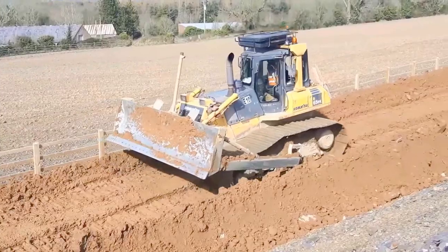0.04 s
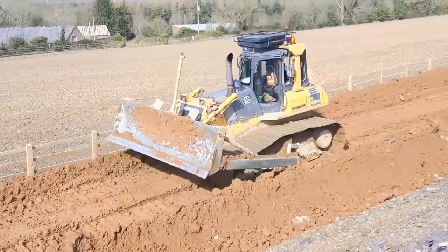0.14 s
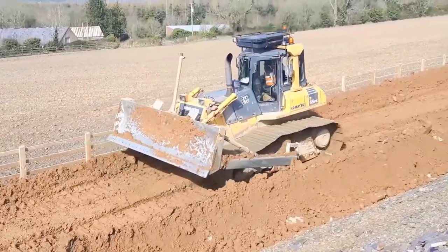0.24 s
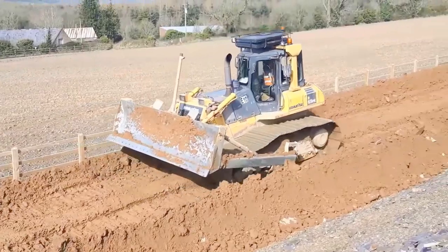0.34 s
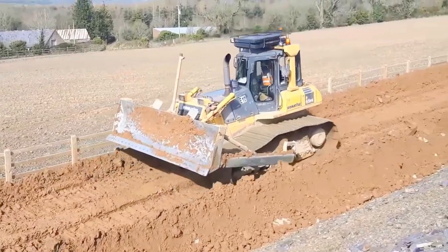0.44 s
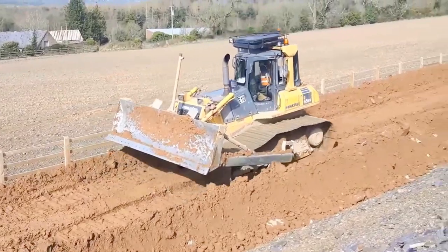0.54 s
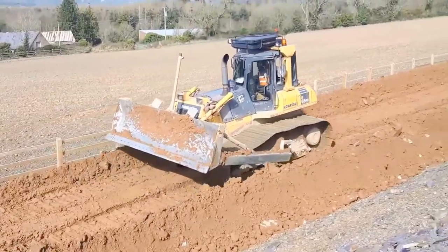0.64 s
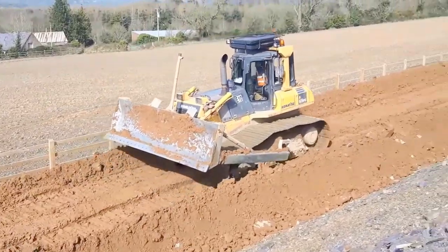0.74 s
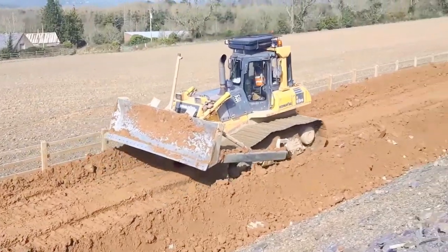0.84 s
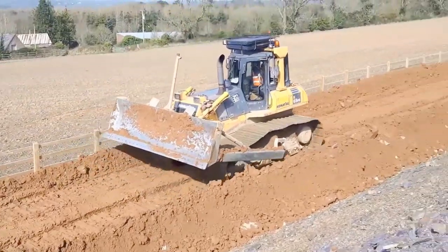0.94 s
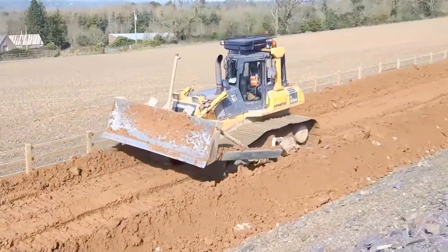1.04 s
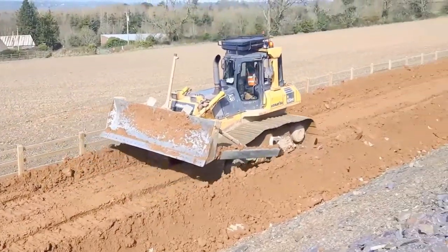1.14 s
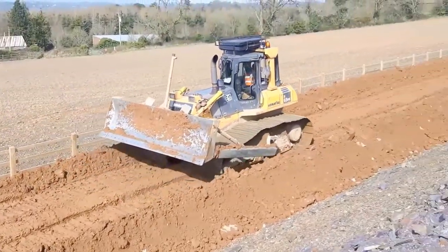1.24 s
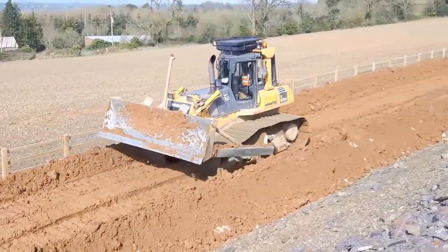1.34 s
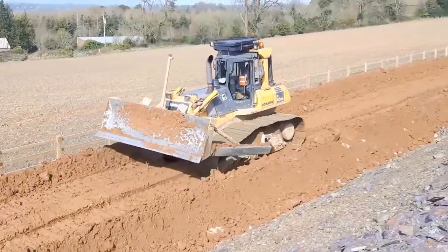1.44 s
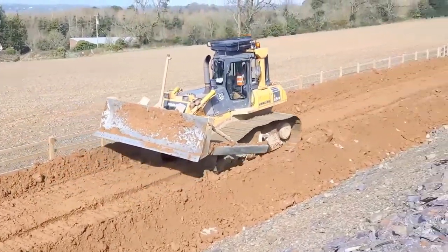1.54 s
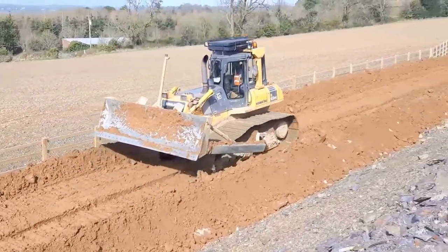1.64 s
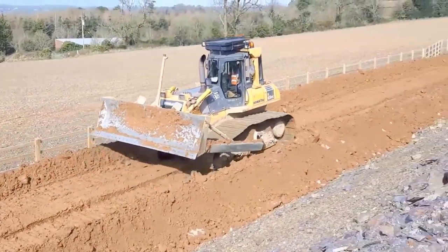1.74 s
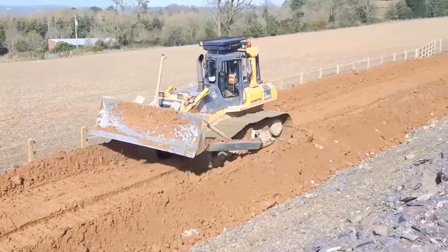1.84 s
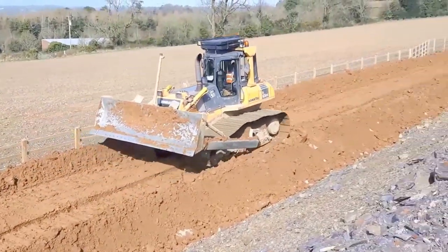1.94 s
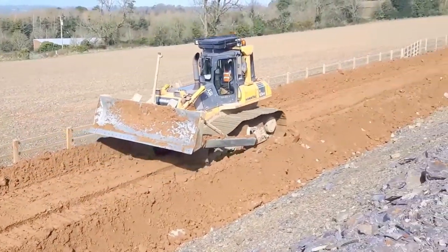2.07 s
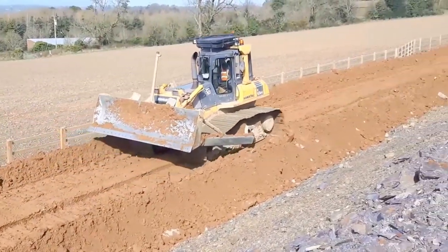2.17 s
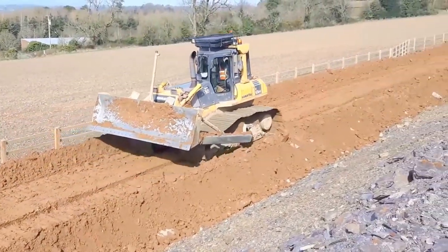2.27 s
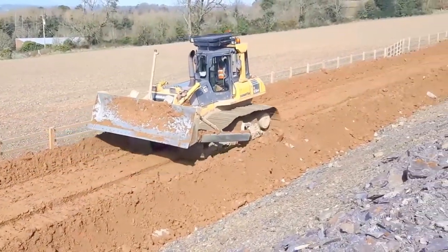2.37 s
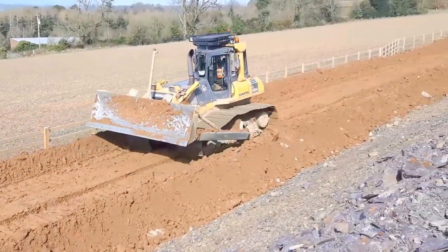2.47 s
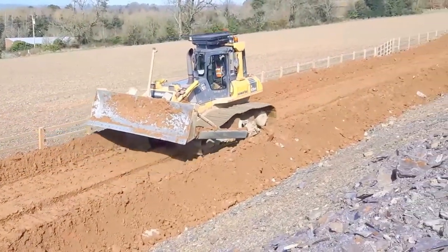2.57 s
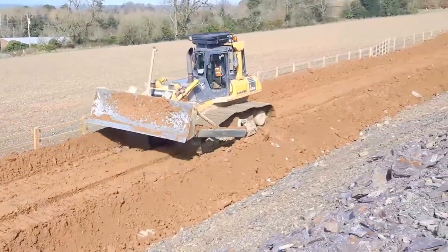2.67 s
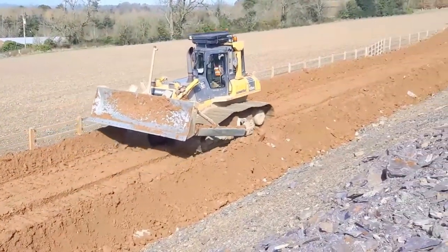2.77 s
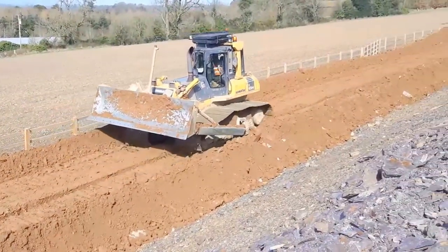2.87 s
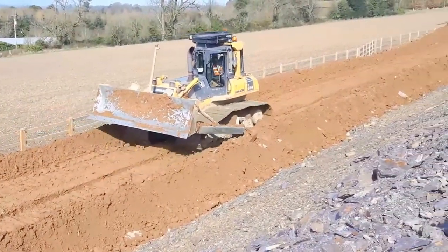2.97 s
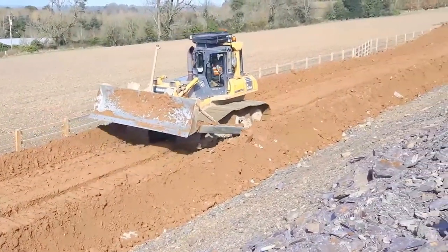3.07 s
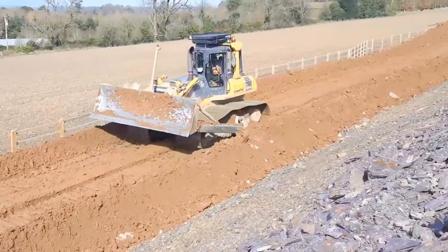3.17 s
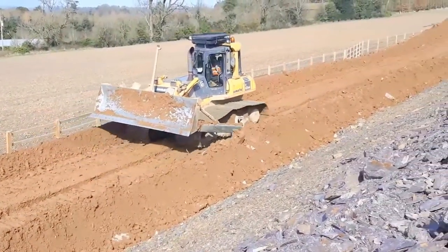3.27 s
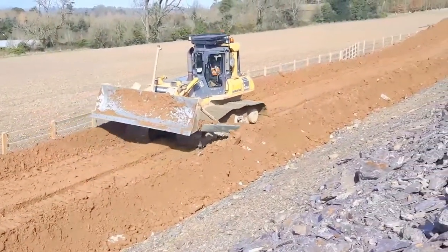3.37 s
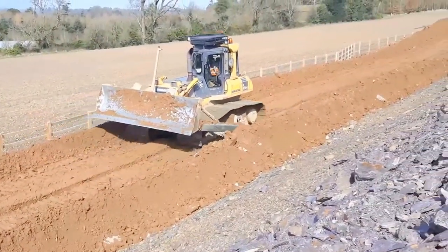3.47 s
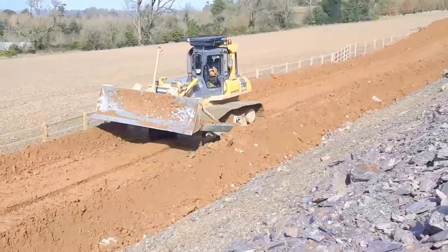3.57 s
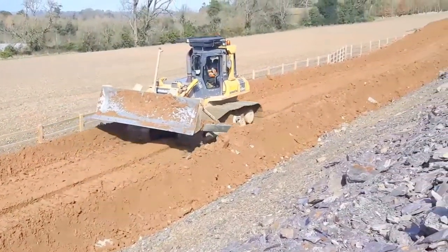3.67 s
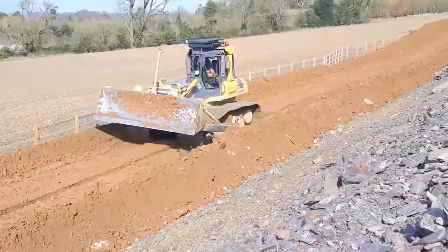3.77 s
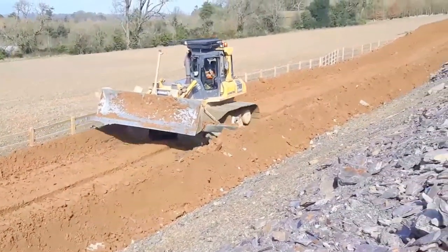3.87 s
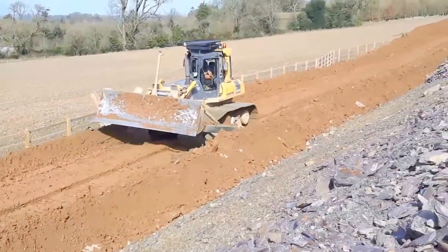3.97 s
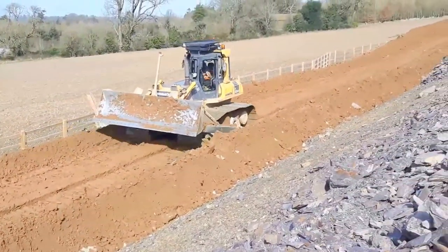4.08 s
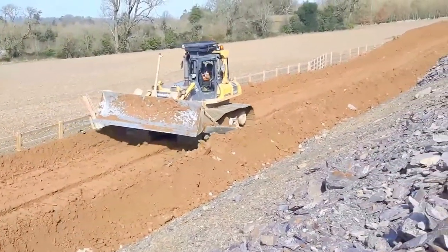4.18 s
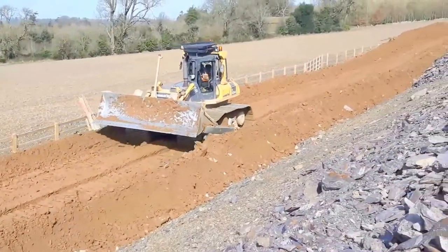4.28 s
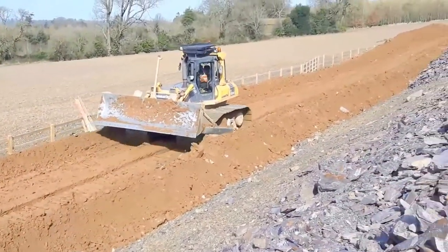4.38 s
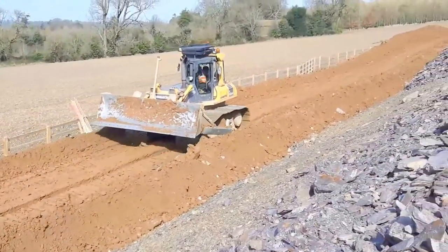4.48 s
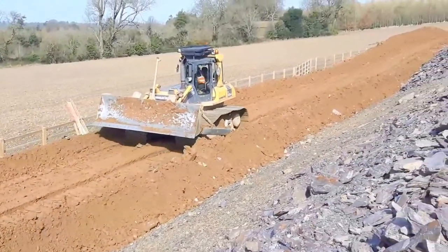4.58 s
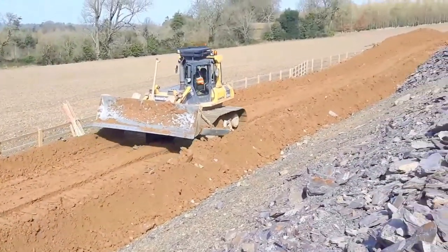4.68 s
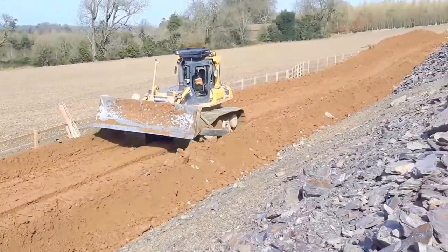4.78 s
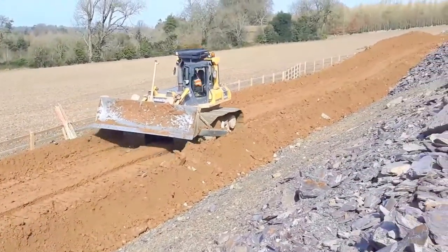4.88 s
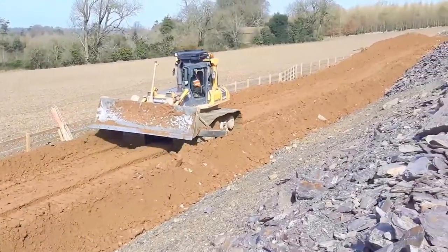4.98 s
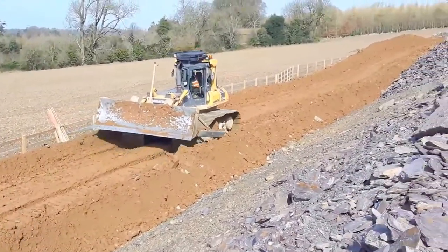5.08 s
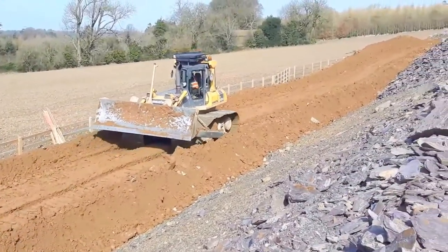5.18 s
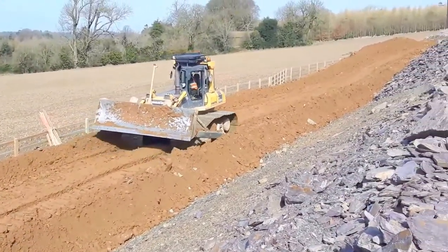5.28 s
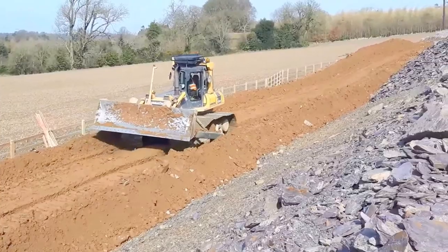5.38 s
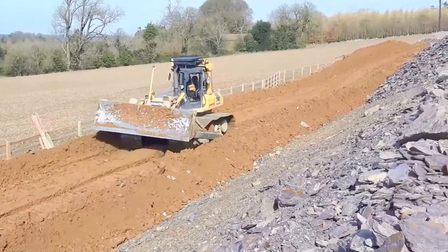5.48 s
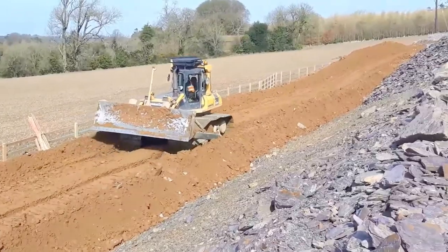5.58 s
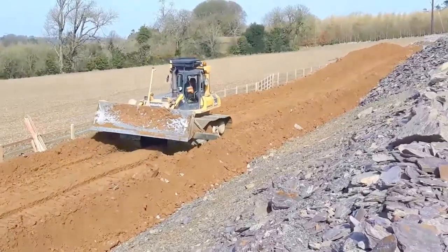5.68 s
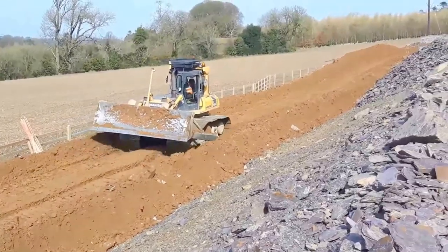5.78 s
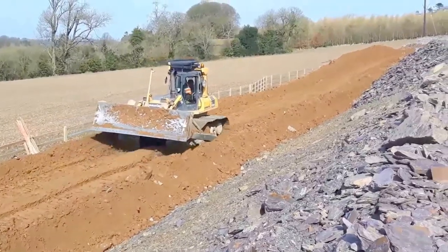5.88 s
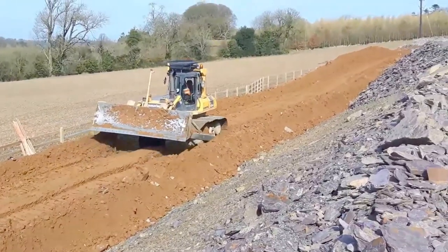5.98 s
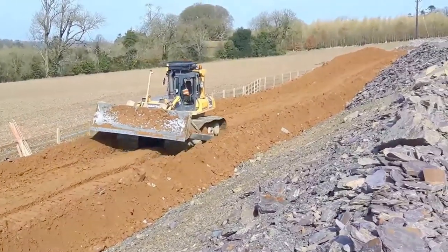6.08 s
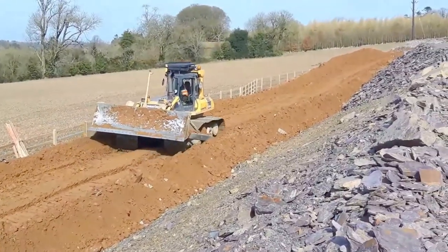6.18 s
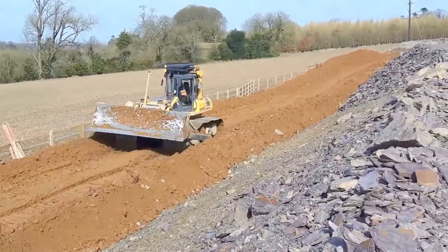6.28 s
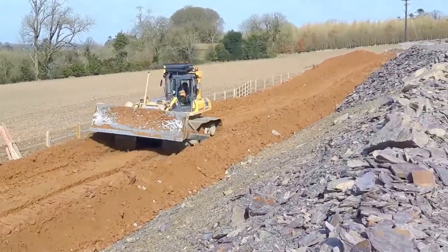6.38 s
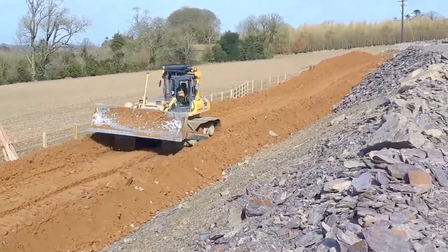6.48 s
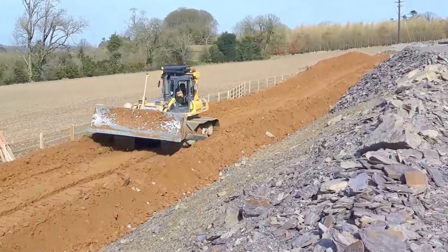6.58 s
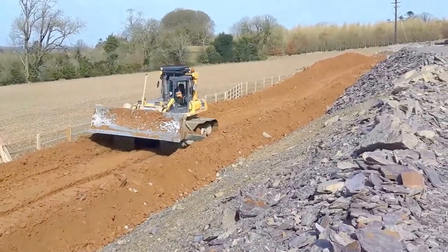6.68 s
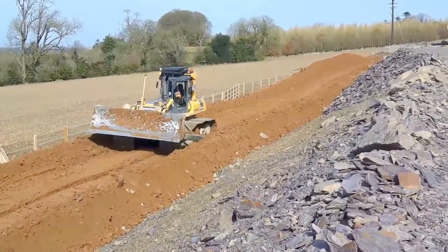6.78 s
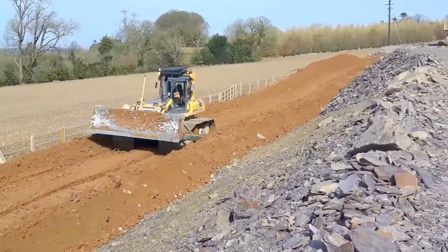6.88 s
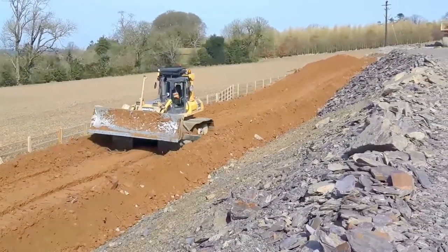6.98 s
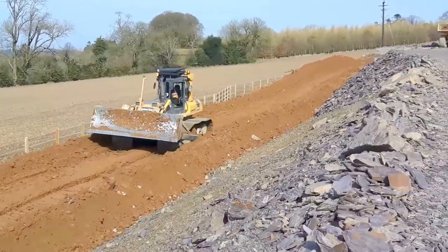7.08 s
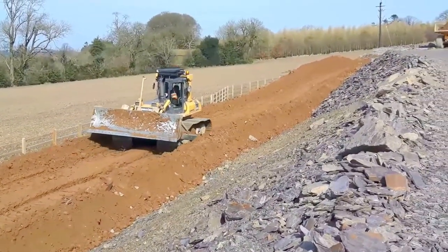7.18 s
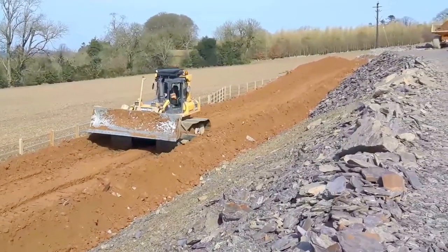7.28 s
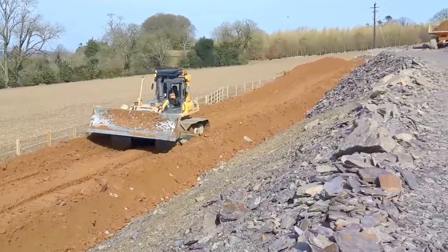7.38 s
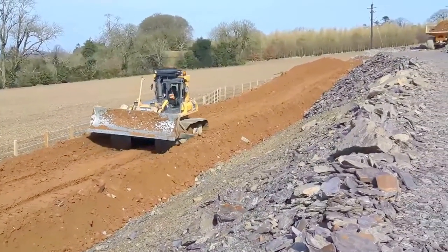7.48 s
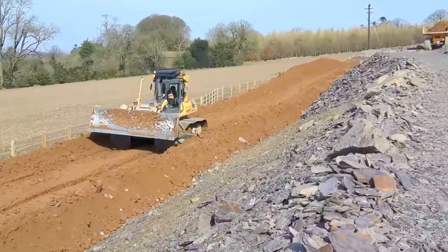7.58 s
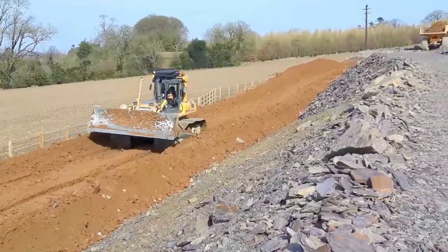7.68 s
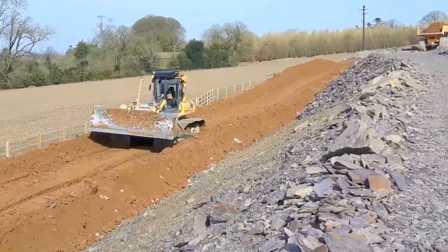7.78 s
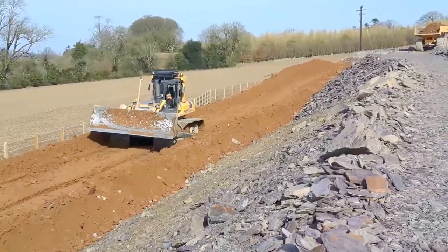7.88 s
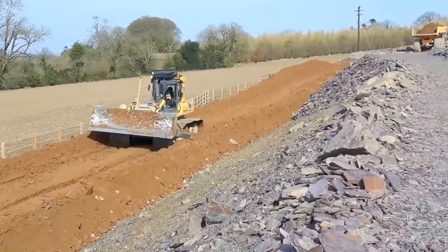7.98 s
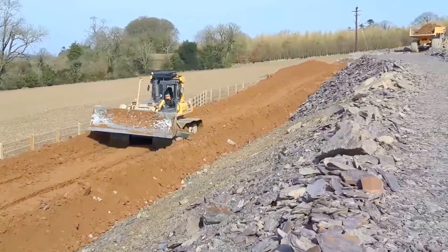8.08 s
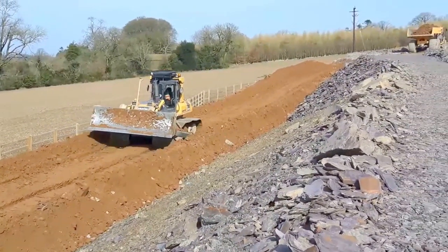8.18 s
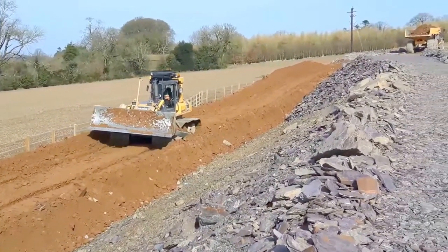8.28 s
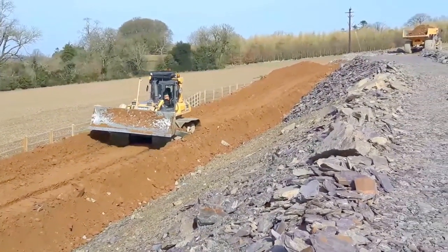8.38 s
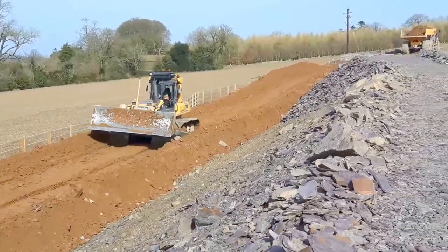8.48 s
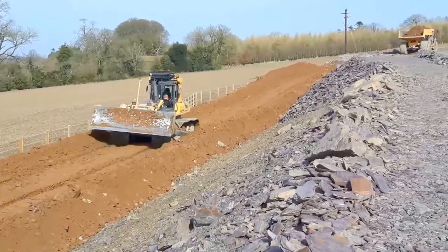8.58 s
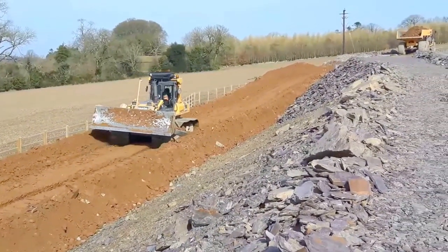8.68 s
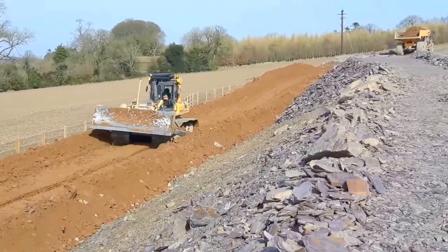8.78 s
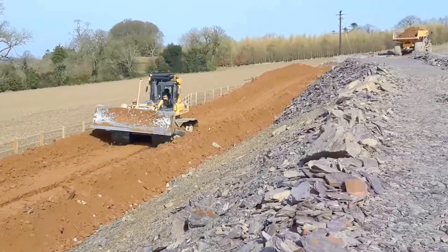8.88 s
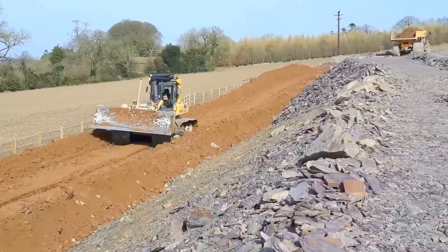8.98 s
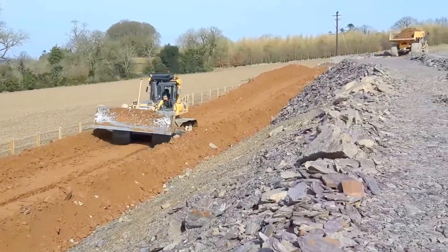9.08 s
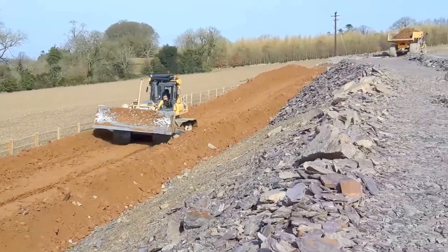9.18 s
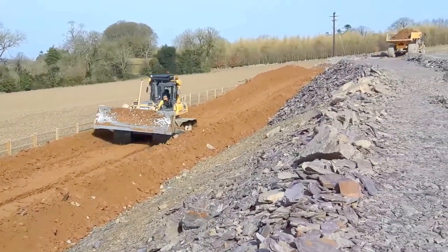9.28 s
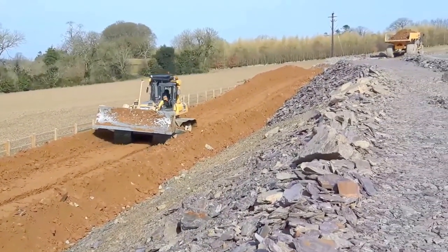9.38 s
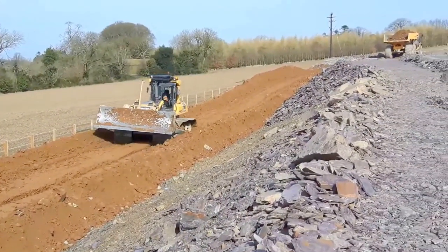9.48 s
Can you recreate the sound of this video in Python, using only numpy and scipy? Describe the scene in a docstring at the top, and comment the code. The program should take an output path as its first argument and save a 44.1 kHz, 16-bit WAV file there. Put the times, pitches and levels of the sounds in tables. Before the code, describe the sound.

Continuous heavy diesel drone under load, with fast, regular metallic track clatter and occasional harder clinks and tiny stone ticks. A wavering gear whine and very faint turbo whistle sit above it. Midway the machine jolts with a short cluster of low booms; afterwards the tracks sound screened and softer as it retreats. Dry open-air site with a barely audible rumble, heard from one fixed mono microphone.

```python
"""A crawler dozer backs away over bare earth: from the start its six-cylinder diesel hums and roars in
sine tones and pulsing noise, its gears whine and its turbocharger whistles faintly.
About ten track shoes a second clank as struck steel, bursts of noise through resonances; stones tick too.
From 3.3 s the shoes land more loosely, and halfway the frame jolts with dull thuds of low noise.
Then the blade screens the tracks, and the machine goes on fading with distance over a soft outdoor floor."""
import sys
import numpy as np
from scipy import signal
from scipy.fft import rfft, irfft, next_fast_len
from scipy.io import wavfile
from scipy.ndimage import map_coordinates

SR = 44100
rng = np.random.default_rng(int(sys.argv[2]) if len(sys.argv) > 2 else 0)


def generate_wav(signal):
    """Clip the signal to [-1, 1] and save it as 16-bit WAV at the path in sys.argv[1]."""
    frames = np.transpose(np.atleast_2d(signal))
    scaled = np.clip(frames, -1, 1) * 32767
    pcm = np.round(scaled).astype(np.int16)
    wavfile.write(sys.argv[1], SR, pcm)


N = 420273  # length in samples, about 9.53 s

# engine firing rate, before a small random drift: t/s, f/Hz
FIRING_RATE = [(0, 100.6), (1.4, 100.6), (1.9, 100.1), (3.2, 100.4), (3.6, 99.9), (4.2, 99.9), (5.1, 100.6),
               (7.4, 100.5), (9.53, 101.2)]
# tones of the exhaust note: multiple of the firing rate, relative level/dB before wavering
EXHAUST_TONES = [(.5, -28), (2 / 3, -24), (1, -5), (4 / 3, -13), (1.5, -9), (2, 0), (3, -20), (10 / 3, -17),
                 (3.5, -19), (4, -19), (6, -24), (7, -22)]
# spectrum of the exhaust roar: f/Hz, relative level/dB
EXHAUST_SPECTRUM = [(20, -41), (40, -27.5), (55, -20), (70, -9), (100, -2.5), (145, -0.5), (200, -3),
                    (270, -5.5), (340, -16.5), (470, -23.5), (700, -31), (1500, -53), (3000, -120)]
# engine load, heard as extra exhaust roar: t/s, level/dB
ENGINE_LOAD = [(0, -1), (1.3, 1), (2.7, -0.5), (3.4, -1.5), (4.3, 2), (5.1, 0), (5.8, 1.5), (6.5, -2),
               (8, -0.5), (9.53, 0.5)]
# pace of the tracks, in shoes laid each second: t/s, f/Hz
TRACK_PACE = [(0, 9.64), (1.85, 9.83), (2.6, 8.96), (2.8, 9.69), (3.2, 9.87), (3.5, 10.76), (4, 10.78),
              (4.2, 9.95), (5.3, 9.71), (5.55, 10.01), (8.65, 10), (9.53, 10.82)]
# resonances of the track steel, first four clunk, the rest clink: f/Hz, width/Hz, relative level/dB
STEEL_MODES = [(685.5, 208, 5), (860, 210, -11.5), (1220, 280, -8.5), (1439, 120, -9), (2158, 392, -6),
               (2422, 110, -12), (2990, 49, -29.5), (3620, 550, -26)]
# shoes that land hard: t/s, extra clunk level/dB, extra clink level/dB
HARD_LANDINGS = [(.222, 1, 5), (1.353, -3, 5), (1.455, 3, 5.5), (1.558, 3, 2), (1.866, 1, 4.5),
                 (1.968, -0.5, 8), (2.176, 2.5, 1.5), (2.283, 2, 8), (2.613, 1.5, 8.5), (3.03, 2, 3),
                 (3.13, 3, 1.5), (3.329, 1, -2), (3.613, 2, 6.5), (3.798, -0.5, 5), (5.398, 2.5, 1),
                 (6.301, 2, -1), (6.401, 0, 3.5), (6.6, 6, 1), (7.4, 1.5, 9), (7.6, 2.5, -6),
                 (7.892, 2.5, 5.5), (8.201, 1.5, 4.5)]
# the blade swings in front of the tracks and screens them: t/s, level change/dB
BLADE_SCREEN = [(0, 0), (1.2, 0.5), (3.8, 1), (4.8, -2), (6.4, -2.5), (7.4, -3.5), (9.53, -1.5)]
# spectrum of the chatter of the running gear: f/Hz, relative level/dB
CHATTER_SPECTRUM = [(250, -41.5), (480, -3.5), (600, 0.5), (780, 0.5), (1150, -7.5), (1450, -13.5),
                    (1650, -21), (2150, -12), (2500, -27), (2720, -29), (3200, -35.5), (3600, -39.5),
                    (4500, -53), (10000, -72.5)]
# resonant bands of the hiss, perhaps coloured by the microphone: f/Hz, width/Hz, relative level/dB
HISS_BANDS = [(3620, 450, 11), (4300, 440, 4), (5170, 440, 2.5), (6240, 170, -10.5), (7275, 410, -2.5),
              (7560, 880, -4)]
# cooling air hiss, raised by 10 dB in use: t/s, level/dB
AIR_HISS = [(0, -67.5), (2.3, -69), (3.3, -74), (5.1, -72.5), (5.55, -77.5), (5.9, -72), (6.2, -75.5),
            (6.6, -72), (7.15, -83), (7.65, -75), (8.0, -78), (9.53, -76)]
# spectrum of the roller drone: f/Hz, relative level/dB
ROLLER_SPECTRUM = [(150, -30), (240, -3), (330, -3), (400, -2.5), (470, -13.5), (650, -28.5), (1500, -90.5)]
# thuds as the frame jolts, before the treble is cut: t/s, level/dB
FRAME_THUDS = [(4.284, -11.5), (4.39, -19), (4.423, -14), (4.441, -13.5), (4.49, -15.5), (4.573, -17),
               (4.63, -19)]
# spectrum of the booming frame: f/Hz, relative level/dB
FRAME_SPECTRUM = [(30, -20), (70, -1.5), (120, 7), (210, 3.5), (330, -2.5), (480, -7.5), (620, -14.5),
                  (900, -28), (1500, -48), (3000, -100)]
# tooth meshing of the drive gears, lowered by 2 dB in use: t/s, f/Hz, level/dB
GEAR_WHINE = [(0, 1050, -36), (.5, 1042, -31), (1.25, 1056, -37.5), (2.05, 1048, -34), (2.36, 1112, -36.5),
              (2.75, 1040, -36.5), (3.1, 1060, -41.5), (3.5, 1145, -43), (4.1, 1135, -45),
              (4.5, 1047, -41.5), (5.1, 1058, -37), (5.8, 1080, -45), (7.5, 1076, -45.5),
              (8.4, 1085, -46.5), (9, 1103, -37), (9.53, 1115, -55)]
# blade rate of the turbocharger, lowered by 2.5 dB in use: t/s, f/Hz, level/dB
TURBO_WHISTLE = [(0, 11130, -80), (.8, 11210, -75), (2.25, 11200, -80), (2.65, 11350, -83),
                 (3.5, 11230, -94), (4.2, 11480, -84), (5.6, 11150, -96), (9.53, 11150, -110)]
# snaps of cracking stones, before the treble is cut: t/s, peak level/dB, f/Hz
STONE_SNAPS = [(.5362, -53, 7340), (1.0874, -55, 7100), (1.4993, -53, 5300), (1.9325, -51, 5500),
               (2.357, -50, 5430), (2.43, -48, 5150), (4.123, -51, 5050), (4.3016, -54, 7360),
               (5.4202, -54.5, 4580), (6.1195, -51, 4600), (7.741, -53, 5000), (8.0396, -51, 4470),
               (9.0094, -58, 7434)]
# colour of the microphone: f/Hz, level/dB
MIC_COLOUR = [(1500, 0), (1700, 2), (1950, 0.5), (2550, -2), (2780, -2), (2980, 1), (3220, -4), (3550, 0.5),
              (3850, 1), (4100, 0)]

START_M, RETREAT_M_PER_S = 14, 1.386  # distance at first, and how fast it grows
# Levels are before fading; each FADE is a share of the loss with distance.
NOTE_DB, NOTE_FADE = -20, 1.1
ROAR_DB, ROAR_FADE = -20, 0.63
CHATTER_DB, CHATTER_FADE = -28.5, 0.82
DRONE_DB, DRONE_FADE = -25, 1.5
SHOE_DB, SHOE_FADE, SHOE_SCREENED = -19.3, 1.7, 1.0  # last: share of the blade's screening
CLINK_DB, CLINK_SPARED = -17.5, 0.11  # clink against clunk; share of the clunk's loss it is spared
CLUNK_SPREAD_DB, CLINK_SPREAD_DB = 1.2, 2.5  # random differences from shoe to shoe
FIRST_SHOE_S, SHOE_SCATTER_S = .018, .001
FAR_LAG_S, FAR_SCATTER_S, FAR_DB = .04, .011, -11  # the far track lands later, looser and weaker
SLACK_FROM_S, SLACK_SCATTER_S, SLACK_DB = 3.3, .004, -1  # slack chain: looser, softer landings
CHAIN_SWING_DB, CHAIN_LAG = 1.2, .22  # chatter swells as links flex; peak as a share of a link's cycle
JOLT_S, JOLT_RISE_S, JOLT_FALL_S, JOLT_DB = 4.49, 0.26, 0.2, -22.5  # shudder: crest time, slopes, level
TOP_HZ = 15720  # nothing is kept from here up


def exhaust(firing):
    """Gas bursts from the cylinders make wavering tones over a turbulent roar that grows with load."""
    note_db = NOTE_DB + NOTE_FADE * distance_db()
    roar_db = ROAR_DB + ROAR_FADE * distance_db() + curves(ENGINE_LOAD)[0]
    note = np.zeros(N)
    for multiple, db in EXHAUST_TONES:
        strength = amp(db + 2.2 * wobble(10))
        phase = multiple * firing + .35 * wobble(7) + rng.uniform(0, 2 * np.pi)
        note += strength * np.sin(phase)
    uneven_puffs = puffs(firing, depth=.12) * amp(1.7 * wobble(15))
    roar = coloured(uneven_puffs, EXHAUST_SPECTRUM)
    return amp(note_db) * unit(note) + amp(roar_db) * roar


def tracks():
    """Each steel shoe slaps down and rebounds: low resonances clunk, upper ones clink."""
    out = np.zeros(N)
    for s, clunk_db, clink_db in landings():
        # every shoe rings slightly differently
        modes = [(hz * (1 + .015 * rng.normal()), width, level + rng.normal(0, 1.5))
                 for hz, width, level in STEEL_MODES]
        rebound = (rng.uniform(.009, .022), rng.uniform(-12, -4))  # (s later, dB)
        far_shoe = (rng.normal(FAR_LAG_S, FAR_SCATTER_S), rng.normal(FAR_DB, 1.5))
        for delay, drop_db in [(0, 0), rebound, far_shoe]:
            clunk = ringing(contact(length=.0075, rattle_db=-9, rattle_t60=.24), modes[:4])
            clink = ringing(contact(length=.007, rattle_db=-13, rattle_t60=.2), modes[4:])
            # packed clay softens the blow
            soft_clunk = muffled(clunk, 1540, order=9)
            soft_clink = muffled(clink, 3600, order=7)
            # start early, as the low modes take a moment to build up
            add(out, s + delay - .003, blow(soft_clunk, clunk_db + drop_db))
            add(out, s + delay - .001, blow(soft_clink, clink_db + drop_db))
    return out


def landings():
    """One shoe lands for each link of travel: rows of (s, clunk dB, clink dB)."""
    links = travel()
    at = np.searchsorted(links, np.arange(int(links[-1]) + 1))  # sample where each link is laid
    slack = at / SR > SLACK_FROM_S
    chance = rng.standard_normal((len(at), 3))
    scatter = np.where(slack, SLACK_SCATTER_S, SHOE_SCATTER_S)
    times = FIRST_SHOE_S + at / SR + chance[:, 0] * scatter
    extra = chance[:, 1:] * [CLUNK_SPREAD_DB, CLINK_SPREAD_DB] + SLACK_DB * slack[:, None]
    for s, *hard_db in HARD_LANDINGS:
        shoe = np.argmin(abs(times - s))  # the nearest shoe takes the hard landing
        times[shoe], extra[shoe] = s, hard_db
    loss_db = (SHOE_FADE * distance_db() + SHOE_SCREENED * curves(BLADE_SCREEN)[0])[at]
    clunk_db = SHOE_DB + loss_db + extra[:, 0]
    clink_db = SHOE_DB + CLINK_DB + (1 - CLINK_SPARED) * loss_db + extra[:, 1]
    return zip(times, clunk_db, clink_db)


def travel():
    """Adding up the pace gives how many links of track have been laid."""
    return np.cumsum(curves(TRACK_PACE)[0]) / SR


def running_gear(firing):
    """Injectors, rollers and links chatter as pulsing noise; cooling air hisses in resonant bands."""
    gear_db = CHATTER_DB + CHATTER_FADE * distance_db() + curves(BLADE_SCREEN)[0]
    flex_db = CHAIN_SWING_DB * np.cos(2 * np.pi * (travel() - CHAIN_LAG))
    hiss_db = curves(AIR_HISS)[0] + 10
    # the cylinders differ in strength
    uneven = 1 + .1 * np.cos(firing / 2) + .09 * np.sin(2 * firing / 3)
    chatter_flicker = amp(1.4 * wobble(160) + 1.1 * wobble(22))
    chatter = coloured(puffs(firing, depth=0.069) * uneven * chatter_flicker, CHATTER_SPECTRUM)
    hiss_flicker = amp(2.1 * wobble(200) + 1.5 * wobble(25))
    hiss = ringing(puffs(firing, depth=.08) * uneven * hiss_flicker, HISS_BANDS)
    soft_hiss = unit(muffled(hiss, 8300, order=8))
    return amp(gear_db + flex_db) * chatter + amp(hiss_db) * soft_hiss


def undercarriage():
    """The rollers drone along the chain, as steady low noise that fades and is screened."""
    drone_db = DRONE_DB + DRONE_FADE * distance_db() + curves(BLADE_SCREEN)[0]
    return amp(drone_db) * coloured(rng.standard_normal(N), ROLLER_SPECTRUM)


def jolts():
    """The heavy frame booms and shudders as it drops over a bump: short and long bursts of low noise."""
    t = np.arange(N) / SR - JOLT_S
    slope_s = np.where(t < 0, JOLT_RISE_S, JOLT_FALL_S)
    shake = amp(JOLT_DB) * np.exp(-(t / slope_s) ** 2)
    thuds = np.zeros(N)
    lead = SR // 100  # 10 ms of room, since the colouring also spreads ahead of the hit
    for s, db in FRAME_THUDS:
        force = np.pad(contact(length=.009, rattle_db=-16, rattle_t60=.1), (lead, 0))
        add(thuds, s - lead / SR, blow(coloured(force, FRAME_SPECTRUM), db))
    shudder = shake * coloured(rng.standard_normal(N), FRAME_SPECTRUM)
    return muffled(thuds, 1200, order=4) + shudder


def drive_gears():
    """Meshing teeth whine in one unsteady tone."""
    return amp(-2) * whistle(GEAR_WHINE, flutter_db=2.5, drift_hz=5.4, drift_rate=90)


def turbocharger():
    """Fast blades whistle faintly at the rate they pass."""
    return amp(-2.5) * whistle(TURBO_WHISTLE, flutter_db=3.5, drift_hz=45, drift_rate=400)


def whistle(rows, flutter_db, drift_hz, drift_rate):
    """A fast-spinning part gives one tone, unsteady in pitch and strength."""
    hz, db = curves(rows)
    flutter = amp(flutter_db * wobble(22))
    tone = np.sin(angle(hz + drift_hz * wobble(drift_rate)))
    return amp(db) * unit(flutter * tone)


def stones():
    """Small stones crack under the shoes, and the steel answers below the snap."""
    snaps, rings = np.zeros(N), np.zeros(N)
    steel_answer = [(1300, 320, 5.5), (2200, 390, 7.0), (3640, 420, -2.5)]  # f/Hz, width/Hz, level/dB
    for s, db, hz in STONE_SNAPS:
        force = contact(length=.005, rattle_db=-12, rattle_t60=.06)
        add(snaps, s, peaking(ringing(force, [(hz, 1200, 0)]), db))
        add(rings, s, peaking(ringing(force, steel_answer), db + 19))
    return muffled(snaps, 9000, order=3) + muffled(rings, 4500, order=6)


def outdoor_floor():
    """Deep noise makes a faint rumble, and plain noise a fainter hiss."""
    spectrum = [(15, -13.5), (30, -2.0), (50, 2.5), (90, -8), (300, -39.5), (2000, -100)]  # f/Hz, level/dB
    rumble = amp(-54) * coloured(rng.standard_normal(N), spectrum)
    return rumble + amp(-75) * rng.standard_normal(N)


def distance_db():
    """Sound pressure falls in proportion to distance as the machine backs away."""
    return -20 * np.log10(1 + RETREAT_M_PER_S * np.arange(N) / SR / START_M)


def puffs(firing, depth):
    """Noise that swells once per firing."""
    return rng.standard_normal(N) * (1 + depth * np.cos(firing))


def contact(length, rattle_db, rattle_t60):
    """Force of a rough impact: a crunch of length s, then a weak rattle losing 60 dB in rattle_t60 s."""
    t = np.arange(SR // 8) / SR
    crunch = np.exp(-(t / length) ** 4)
    rattle = amp(rattle_db - 60 * t / rattle_t60)
    return (crunch + rattle) * rng.standard_normal(len(t))


def ringing(x, modes):
    """x through steep-sided resonances (Hz, width Hz, dB), at rms 1."""
    def response(f):
        total = 0
        for centre, width, db in modes:
            band = 1j * f * width / (centre * centre - f * f + 1j * f * width)
            total = total + amp(db) * band ** 2  # squared for steeper sides
        return total
    return unit(filtered(x, response))


def coloured(x, points):
    """x with its spectrum shaped by (Hz, dB) points, at rms 1."""
    hz, db = np.transpose(points)
    return unit(filtered(x, lambda f: amp(np.interp(np.log(f + 1), np.log(hz), db))))


def muffled(x, hz, order):
    """x without its treble above hz."""
    return signal.sosfilt(signal.butter(order, hz, fs=SR, output="sos"), x)


def filtered(x, response):
    """x times a response of frequency."""
    m = next_fast_len(len(x) + 4096)
    return irfft(rfft(x, m) * response(np.fft.rfftfreq(m, 1 / SR)), m)[:len(x)]


def blow(x, db):
    """x with as much energy as 20 ms of sound at rms level db."""
    return amp(db) * x * np.sqrt(SR / 50 / np.sum(x ** 2))


def peaking(x, db):
    """x with its peak at db."""
    return amp(db) * x / np.abs(x).max()


def unit(x):
    """Scale to rms 1."""
    return x / np.sqrt(np.mean(x ** 2) + 1e-20)


def amp(db):
    """Decibels to gain."""
    return 10 ** (np.asarray(db) / 20)


def curves(rows):
    """One value per sample for each column after the time."""
    s, *cols = np.transpose(rows)
    return [np.interp(np.arange(N) / SR, s, c) for c in cols]


def wobble(rate):
    """A smooth random curve through rate random points a second."""
    knots = rng.standard_normal(int(N * rate / SR) + 4)
    return map_coordinates(knots, [np.arange(N) * rate / SR])


def angle(hz):
    """Phase in radians of something turning at hz."""
    return 2 * np.pi * np.cumsum(hz) / SR


def add(track, s, sound):
    """Mix a sound in at time s."""
    part = track[max(round(s * SR), 0):][:len(sound)]
    part += sound[:len(part)]


def scene():
    """The whole machine over a faint outdoor rumble and hiss."""
    firing = angle(curves(FIRING_RATE)[0] + 0.16 * wobble(5))
    engine = exhaust(firing) + running_gear(firing) + turbocharger()
    crawler = tracks() + undercarriage() + jolts() + drive_gears() + stones()
    return (engine + crawler + outdoor_floor())[None]


def record(dry):
    """The microphone colours the upper middle range and cuts the top; both ends get a 4 ms fade."""
    hz, db = np.transpose(MIC_COLOUR)
    edge_s = np.minimum(np.arange(N), np.arange(N)[::-1]) / SR  # time to the nearer end
    faded = dry[0] * np.minimum(edge_s / .004, 1)
    return np.array([filtered(faded, lambda f: amp(np.interp(f, hz, db)) * (f < TOP_HZ))])


dry = scene()
out = record(dry)
generate_wav(out)
```